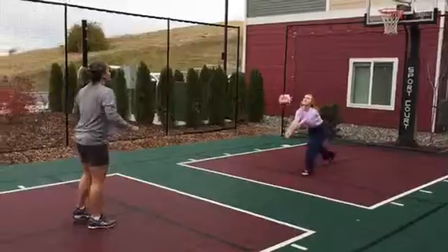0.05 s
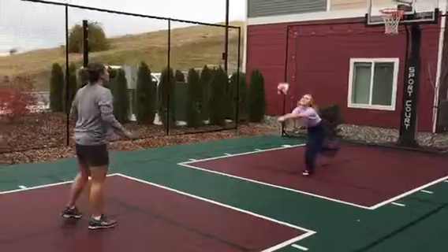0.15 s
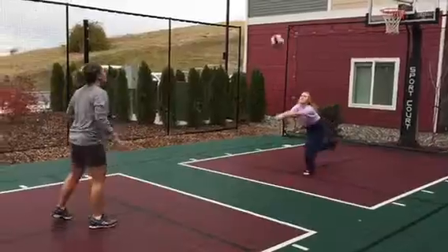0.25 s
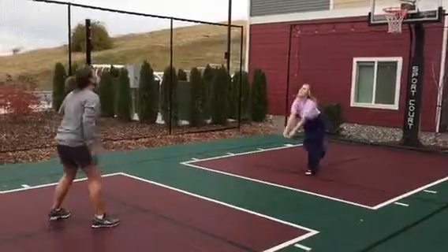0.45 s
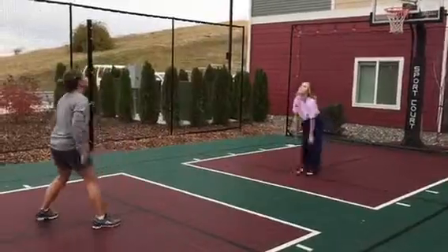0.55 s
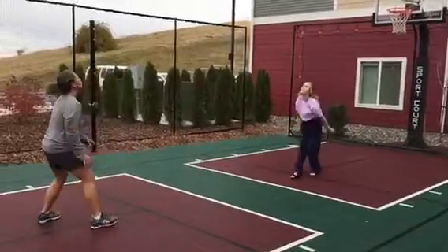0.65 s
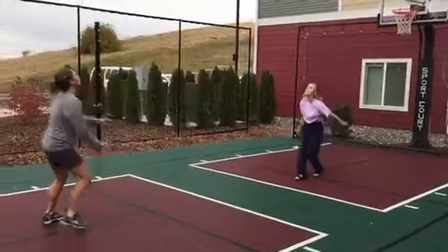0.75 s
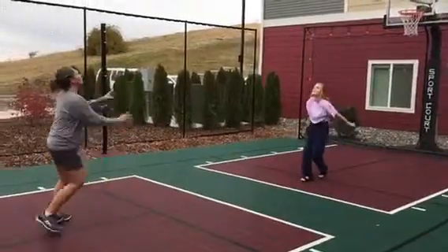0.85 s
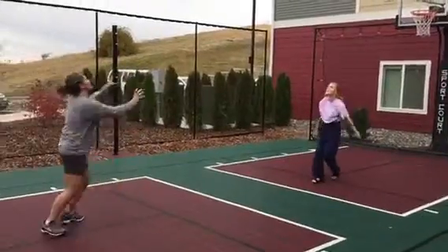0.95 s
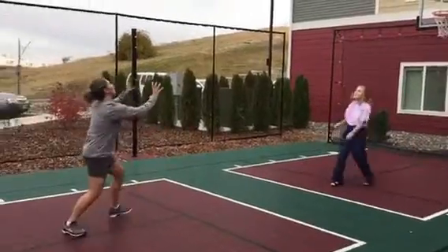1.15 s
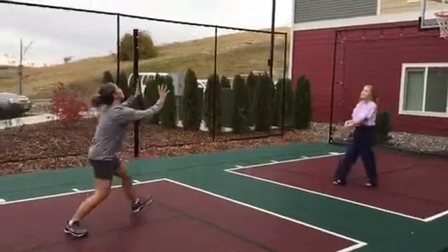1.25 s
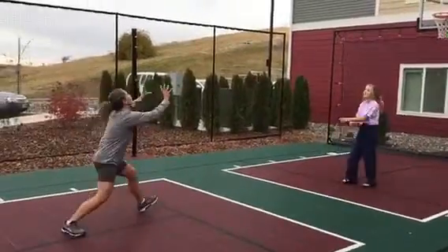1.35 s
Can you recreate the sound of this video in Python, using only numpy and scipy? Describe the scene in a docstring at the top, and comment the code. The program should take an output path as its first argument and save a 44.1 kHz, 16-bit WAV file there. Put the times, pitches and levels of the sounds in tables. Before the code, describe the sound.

A volleyball is struck once off the forearms outdoors, with faint shoe scuffs and low rumble.

```python
"""A low outdoor rumble with a faint whine, and shoes scuffing on a gritty court beside a house.
Then a volleyball is passed off the forearms: skin slaps on leather, the flexing ball booms
and the air inside it rings. The house answers with echoes and the yard scatters a short tail.
A player steps into place, soles crunching on grit and landing with soft thuds."""
import sys
import numpy as np
from scipy import signal
from scipy.fft import rfft, irfft
from scipy.io import wavfile

SR = 44100
rng = np.random.default_rng(int(sys.argv[2]) if len(sys.argv) > 2 else 0)


def generate_wav(signal):
    """Clip the signal to [-1, 1] and save it as 16-bit WAV at the path in sys.argv[1]."""
    frames = np.transpose(np.atleast_2d(signal))
    scaled = np.clip(frames, -1, 1) * 32767
    pcm = np.round(scaled).astype(np.int16)
    wavfile.write(sys.argv[1], SR, pcm)


N = 61739
T = np.arange(N) / SR

# colour of the outdoor bed: f/Hz, relative density/dB
BED_COLOUR = [(15, -35), (25, -7), (49, 1), (96, 0.5), (140, -2), (246, -7), (410, -19), (648, -16),
              (804, -20), (945, -13.5), (1200, -18), (1340, -19), (1900, -26), (2170, -26.5), (3260, -39),
              (3530, -35), (5140, -43), (6920, -44.5), (10100, -51), (14300, -51), (15500, -54)]

# colour of crushed grit: f/Hz, relative density/dB
GRIT_COLOUR = [(200, -20), (900, 10), (1800, 10), (2800, 4.5), (5000, -4), (7000, -3.5), (10000, -2),
               (14500, -3.5)]
# shoe scuffs: t/s, level/dB, fade to 1/e/s, bright peak f/Hz
SHOE_SCUFFS = [(0.017, -60.5, 0.011, 6900), (0.051, -59, 0.0097, 14500), (.108, -69, 0.013, 12800),
               (.377, -57, 0.011, 13000), (.386, -65, 0.013, 13000), (0.44, -70.5, 0.019, 9900),
               (0.64, -59, .012, 7450), (.649, -58, .006, 14000), (0.6578, -48, 0.0026, 14300),
               (0.66, -43.5, 0.0032, 13400), (0.676, -58, 0.0044, 13000), (.7003, -51, 0.0027, 11800),
               (.7035, -48.5, 0.0057, 7200), (0.7402, -47, 0.0085, 14300), (.752, -55, 0.0057, 12400),
               (.7535, -51, 0.004, 2700), (0.778, -54.5, 0.0048, 13400), (.992, -62, 0.027, 14000),
               (1.01, -54.5, 0.0079, 14500), (1.0282, -45.5, 0.0044, 12900), (1.029, -50, 0.0041, 3730),
               (1.053, -58, 0.015, 14700), (1.153, -54, 0.0032, 15000), (1.152, -55.5, 0.0068, 5400),
               (1.341, -69, .01, 11500)]

HIT_S = .2237
BOOM_S = HIT_S + .001  # the ball is squeezed before it booms
# the forearms land one after the other: t/s after the hit, level/dB
FOREARMS = [(0, -10), (.0012, -8)]
# boom of the flexing ball: f/Hz, level/dB, rise/s
BOOM_MODES = [(100, -15.3, .0094), (169, -15, .0092), (290, -27, .009)]
# ring of the air inside the ball: f/Hz, level/dB, t60/s
AIR_MODES = [(391, -39, 0.075), (527, -37, 0.066), (676, -32.5, 0.057), (822, -36, 0.12),
             (1054, -40.5, 0.086), (1265, -40.5, 0.11), (1813, -52, 0.46), (1946, -34.5, 0.036),
             (2410, -68, 0.27), (2760, -50, 0.078), (3240, -38, .015), (4800, -42, .012),
             (6540, -34, 0.013)]

# scatter off the nearby court and fence: f/Hz, relative density/dB
SCATTER_COLOUR = [(100, -14), (350, 3), (800, 13.5), (1300, 8.5), (2200, 6), (4000, -6.5), (9000, -8),
                  (15000, -10)]
# colour of the yard's tail: f/Hz, relative density/dB
TAIL_COLOUR = [(40, -22), (75, 5.5), (120, 3), (180, -2), (300, -6.5), (600, -23), (1200, -24),
               (2000, -22.5), (3200, -32.5), (5000, -31.5), (9000, -39.5), (15000, -45.5)]
# swell of the tail, quickest in the treble: f/Hz, rise/s
TAIL_SWELL = [(150, 0.023), (600, 0.028), (2000, 0.02), (8000, 0.006)]
# decay of the tail: f/Hz, t60/s
TAIL_DECAY = [(100, 0.38), (500, 0.34), (2000, 0.39), (6000, 0.33), (14000, 0.27)]
# echoes off the house: t/s after the hit, level/dB relative to it
HOUSE_ECHOES = [(.048, -17.5), (0.0596, -18.5), (.099, -25), (.111, -26.5), (.148, -30)]

# footfalls: t/s, thud level/dB, knock level/dB
FOOTFALLS = [(.696, -50, -39), (.905, -40, -65), (1.168, -42.5, -70)]
# thud of the weight landing: f/Hz, relative level/dB, t60/s
THUD_MODES = [(69, 1, 0.15), (138, 2.5, 0.18)]
# knock of a sole: f/Hz, relative level/dB, t60/s
SOLE_MODES = [(516, -3.5, 0.033), (704, -2, 0.028), (1110, -3, 0.037)]


def from_db(db):
    """Decibels to gain."""
    return 10 ** (np.asarray(db) / 20)


def unit_rms(x):
    """Scale to rms 1."""
    return x / np.sqrt(np.mean(x ** 2) + 1e-20)


def at_hz(points, hz):
    """Read a table on a log-frequency axis."""
    freqs, values = np.transpose(points)
    return np.interp(np.log(hz), np.log(freqs), values)


def since(s):
    """Time since s, zero before."""
    return np.maximum(T - s, 0)


def delayed(x, s):
    """The same sound s seconds later."""
    return np.interp(np.arange(N) - np.round(s * SR), np.arange(N), x, left=0)


def butter(x, hz, kind, order=2):
    """Butterworth low- or high-pass."""
    return signal.sosfilt(signal.butter(order, hz, kind, fs=SR, output="sos"), x + 1e-18)


def resonance(x, hz, width_hz):
    """Band-pass with gain 1 at its peak."""
    r = np.exp(-np.pi * width_hz / SR)
    feedback = [1, -2 * r * np.cos(2 * np.pi * hz / SR), r * r]
    return signal.lfilter((1 - r * r) / 2 * np.array([1, 0, -1]), feedback, x)


def noise(colour):
    """Noise of a given colour, rms 1."""
    hz = np.maximum(np.fft.rfftfreq(2 * N, 1 / SR), 1)
    white = rfft(rng.standard_normal(2 * N))
    return unit_rms(irfft(white * from_db(at_hz(colour, hz)))[:N])


def octaves(x):
    """Split into overlapping octave bands that sum to the whole: (f/Hz, band) pairs."""
    centres = 31.25 * 2. ** np.arange(10)
    log_hz = np.log(np.maximum(np.fft.rfftfreq(2 * N, 1 / SR), 1))
    spectrum = rfft(x, 2 * N)
    for hz in centres:
        weight = np.interp(log_hz, np.log(centres), 1. * (centres == hz))
        yield hz, irfft(spectrum * weight)[:N]


def drift(rate_hz):
    """Smooth random wander, rms 1."""
    r = np.exp(-2 * np.pi * rate_hz / SR)
    return unit_rms(signal.lfilter([1], [1, -2 * r, r * r], rng.standard_normal(2 * N))[N:])


def ring(modes, s):
    """Modes struck at time s, alternating in sign."""
    t = since(s)
    return sum((-1) ** k * from_db(db - 60 * t / t60) * np.sin(2 * np.pi * hz * t)
               for k, (hz, db, t60) in enumerate(modes))


def outdoor_bed():
    """Low uneven rumble and far hiss, each octave wavering on its own."""
    bed = np.zeros(N)
    for hz, band in octaves(noise(BED_COLOUR)):
        flicker_db = 2.5 if hz < 500 else 1.73
        bed += band * from_db(flicker_db * drift(rate_hz=8.2))
    return from_db(-46) * unit_rms(butter(bed, 47.3, "high"))  # the deepest rumble rolls off


def far_whine(hz=953.6, width_hz=13.4):
    """A thin, faint tone that wanders in level and phase."""
    phase = 2 * np.pi * hz * T
    return from_db(-65) * unit_rms(drift(width_hz) * np.sin(phase) + drift(width_hz) * np.cos(phase))


def scuffs(attack_s=.00074, crunch_db=3, tail_s=.018):
    """Soles crush grit in short bursts, each with its own bright peak and a faint tail."""
    grit = noise(GRIT_COLOUR) * from_db(crunch_db * np.clip(drift(rate_hz=460), -2, 2))
    bursts, power = np.zeros(N), np.zeros(N)
    for s, db, fade_s, hz in SHOE_SCUFFS:
        t = since(s)
        press = from_db(db) * np.minimum(t / attack_s, 1) * np.exp(-t / fade_s)
        bright = from_db(11) * resonance(grit, hz, width_hz=1650)
        bursts += press * unit_rms(grit + bright)
        power += press ** 2
    r = np.exp(-1 / (tail_s * SR))
    afterglow = np.sqrt(signal.lfilter([1 - r], [1, -r], power))
    return bursts + from_db(-6.5) * afterglow * noise(GRIT_COLOUR)


def forearm_slap(crack_db=-17.5, crack_t60_s=.0083):
    """Each forearm clicks against the leather, which creases with a brief crack."""
    slap = np.zeros(N)
    for lag_s, db in FOREARMS:
        t = since(HIT_S + lag_s)
        contact = from_db(crack_db - 60 * t / crack_t60_s) * (t > 0) * rng.standard_normal(N)
        contact[np.argmax(t > 0)] -= 2  # the click of skin, one sample long
        slap += from_db(db) * contact
    slap = butter(slap, 2260, "high", order=1)
    return butter(slap, 5070, "low", order=1)


def ball_boom():
    """The boom swells while the ball is squeezed and dies within a few cycles."""
    t = since(BOOM_S)
    boom = np.zeros(N)
    for k, (hz, db, rise_s) in enumerate(BOOM_MODES):
        swell = t / rise_s * np.exp(.5 - .5 * (t / rise_s) ** 2)
        boom -= (-1) ** k * from_db(db) * swell * np.sin(2 * np.pi * hz * t)
    return boom


def ball_air(release_s=.0086):
    """The air inside rings on impact, then again, duller, as the ball snaps back into shape."""
    release = butter(ring(AIR_MODES, HIT_S + release_s), 2380, "low")
    return ring(AIR_MODES, BOOM_S) + from_db(-1.5) * release


def yard_reverb(scatter_t60_s=.069):
    """Quick scatter off court and fence, and a tail that swells and dies band by band."""
    t = since(BOOM_S)
    scatter = noise(SCATTER_COLOUR) * (t > 0) * from_db(-30.5 - 60 * t / scatter_t60_s)
    tail = np.zeros(N)
    for hz, band in octaves(noise(TAIL_COLOUR)):
        swell = 1 - np.exp(-(t / at_hz(TAIL_SWELL, hz)) ** 2)
        tail += band * swell * from_db(-60 * t / at_hz(TAIL_DECAY, hz))
    return scatter + from_db(-25.5) * tail


def house_echoes(hit):
    """The wall throws the hit back as darker slapbacks."""
    echoes = sum(from_db(db) * delayed(hit, s) for s, db in HOUSE_ECHOES)
    return butter(echoes, 5700, "low", order=1)


def footsteps():
    """The player's weight lands with a thud and the sole knocks."""
    return sum(from_db(thud_db) * ring(THUD_MODES, s) + from_db(knock_db) * ring(SOLE_MODES, s)
               for s, thud_db, knock_db in FOOTFALLS)


def scene():
    """Mono mix of the pass, its reflections, the footwork and the outdoor bed."""
    hit = forearm_slap() + ball_boom() + ball_air()
    reflections = yard_reverb() + house_echoes(hit)
    footwork = scuffs() + footsteps()
    return (hit + reflections + footwork + outdoor_bed() + far_whine())[None]


def record(dry):
    """A steep low-pass shaves off the very top."""
    return signal.sosfilt(signal.ellip(10, .1, 80, 15250, fs=SR, output="sos"), dry)


dry = scene()
out = record(dry)
generate_wav(out)
```